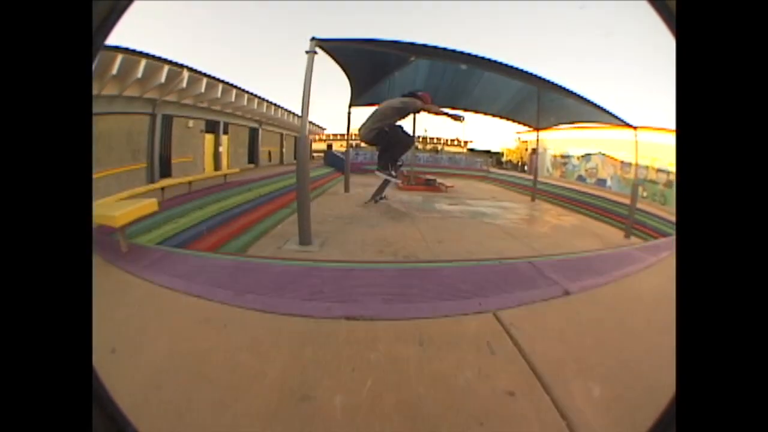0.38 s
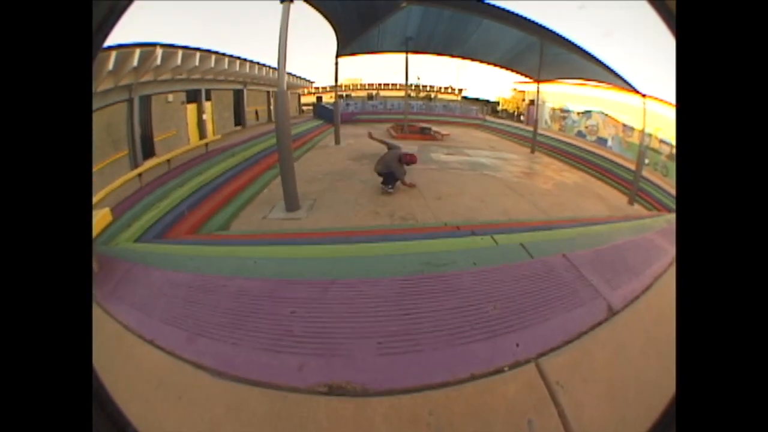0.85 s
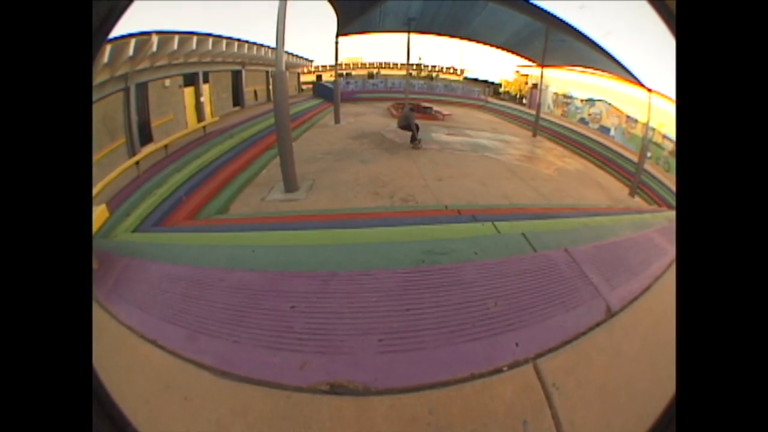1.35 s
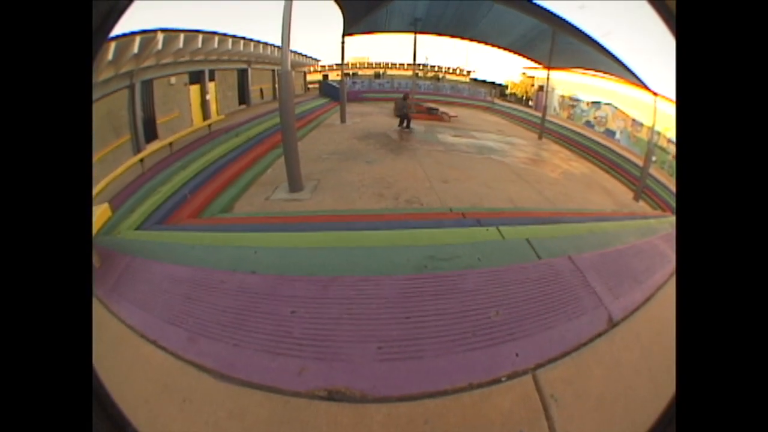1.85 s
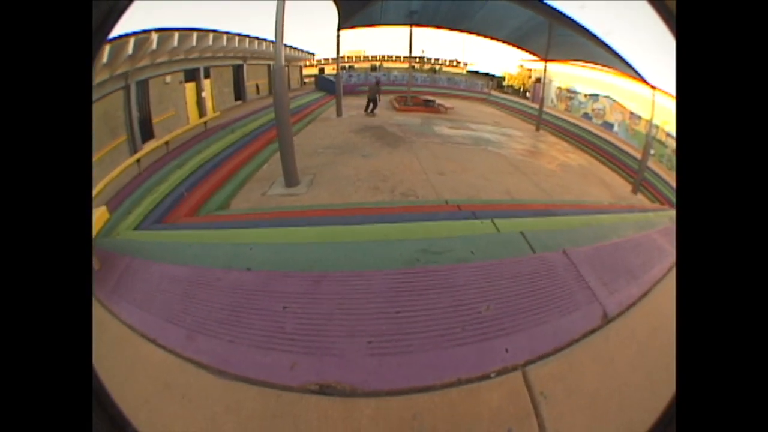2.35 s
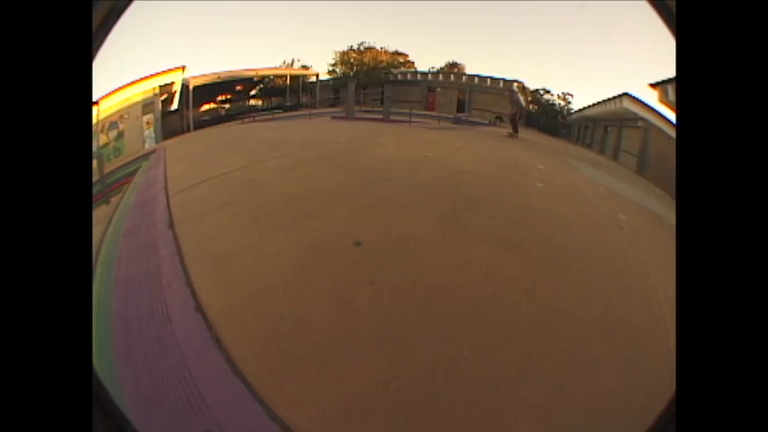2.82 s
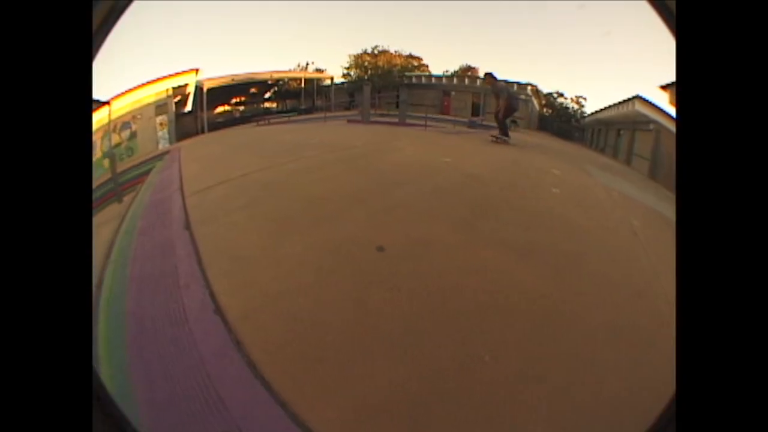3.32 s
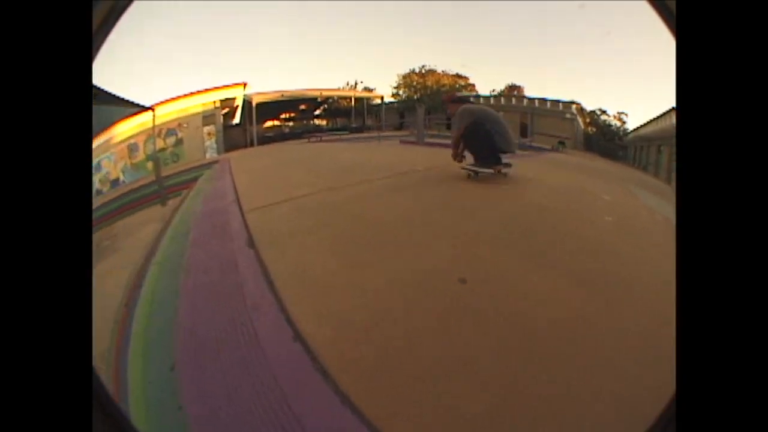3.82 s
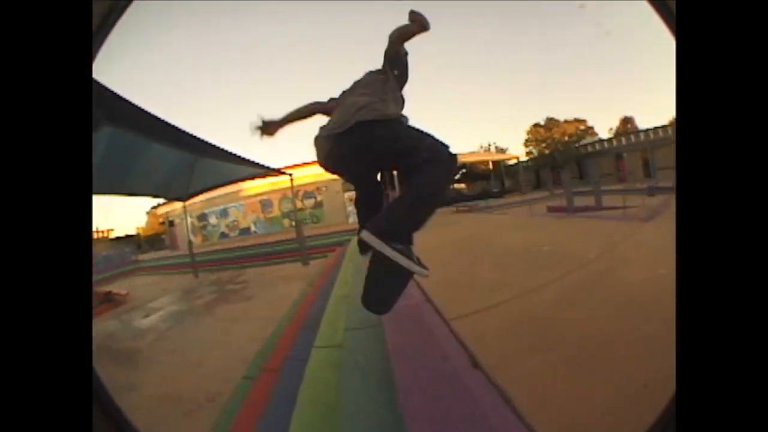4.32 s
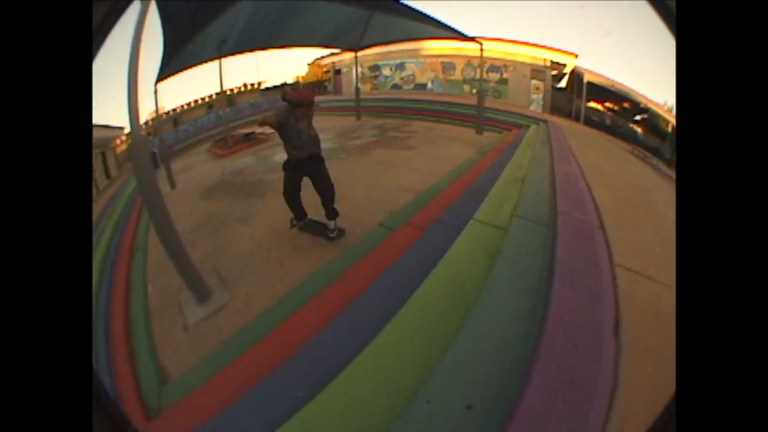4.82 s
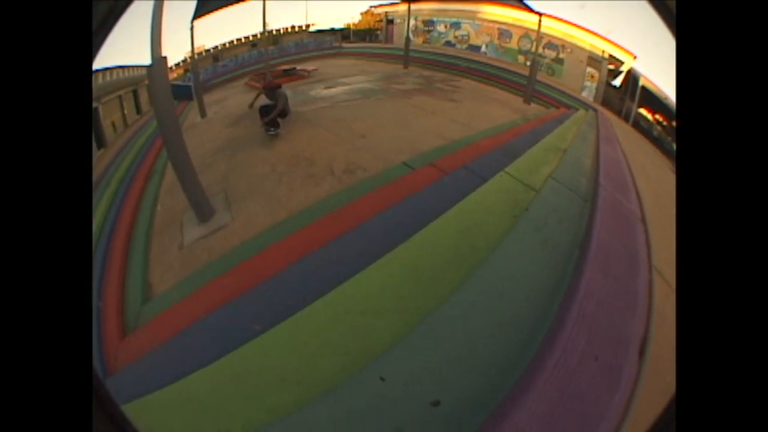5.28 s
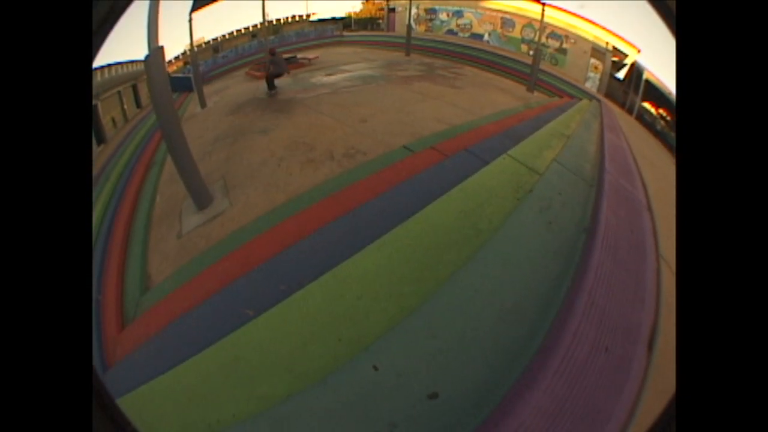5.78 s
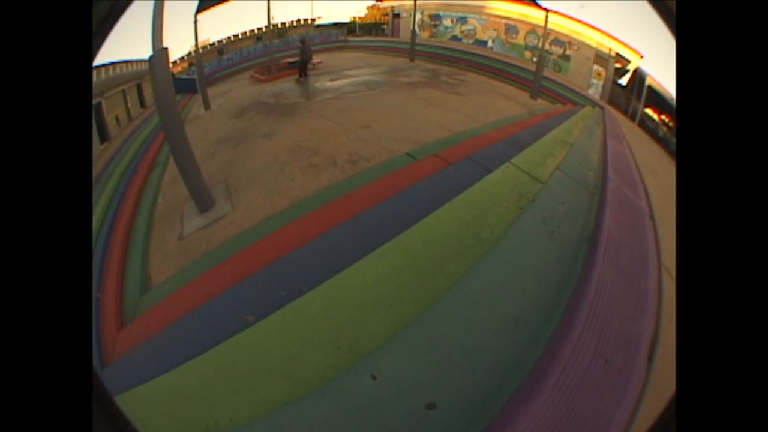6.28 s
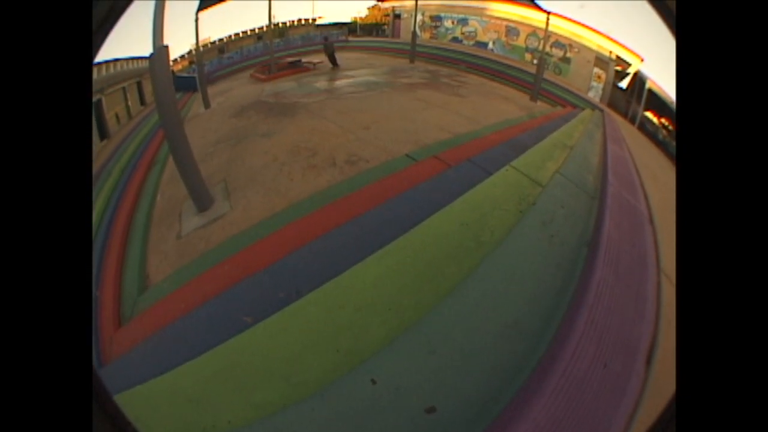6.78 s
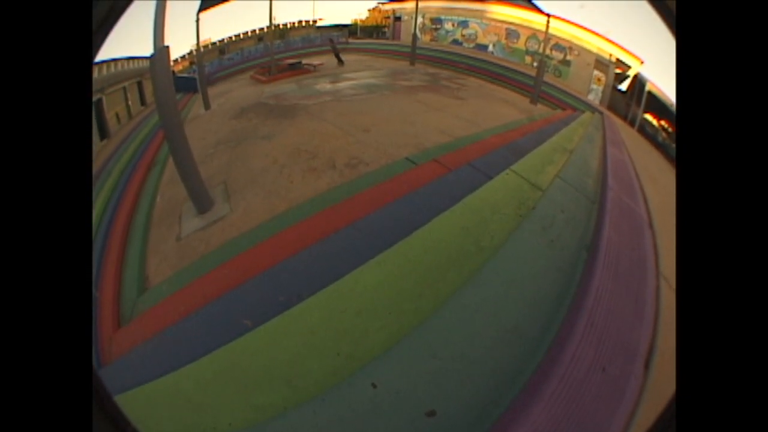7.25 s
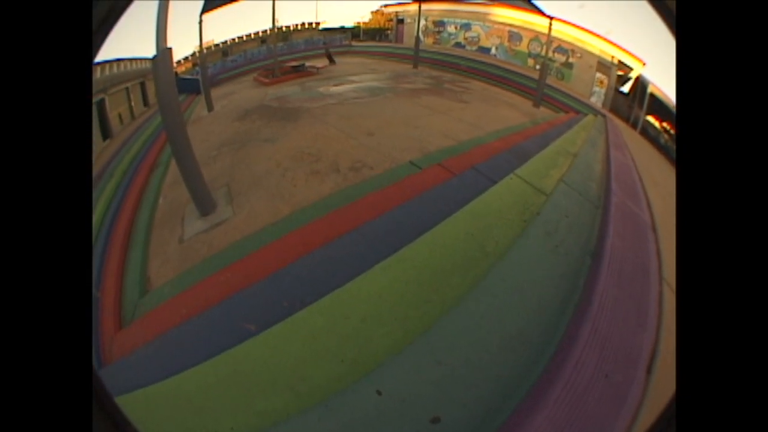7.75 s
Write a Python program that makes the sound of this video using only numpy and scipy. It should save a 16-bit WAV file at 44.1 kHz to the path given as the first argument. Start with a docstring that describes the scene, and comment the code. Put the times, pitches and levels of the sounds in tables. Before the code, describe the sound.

Two skateboard jumps heard by a small stereo microphone beside wide steps. The first starts at the pop, with light ticks, a thin squeak and a sharp landing, then faint rolling. After an abrupt cut, gritty rolling approaches with knocks, a loud snap launches the board, spinning wheels hum, and a heavier distorted landing rings off the walls before the wheels recede.

```python
"""A skateboard in a paved school yard, heard from two places one after the other.
First the tail pops, the board flips, a shoe squeaks, the board lands with a crack below some steps and rolls away.
Then it rolls up over a joint, pops, hums in the air, lands hard and rolls off again.
Noise-driven deck resonances make blows and rolling, short sines the squeak, an unsteady sine the hum.
Decaying noise makes the answering walls; a small stereo microphone overloads on the loudest blows."""
import sys
import numpy as np
from scipy import signal
from scipy.io import wavfile
from scipy.ndimage import uniform_filter1d, map_coordinates

SR = 44100
rng = np.random.default_rng(int(sys.argv[2]) if len(sys.argv) > 2 else 0)


def to_wav(sig):
    """Store sig (one row per channel, or 1-D mono) as 16-bit WAV at the path in sys.argv[1].

    Samples outside -1..1 are clipped; the rate is SR.
    """
    pcm = np.clip(np.atleast_2d(sig), -1, 1) * 32767
    pcm = np.round(pcm).astype(np.int16)
    wavfile.write(sys.argv[1], SR, pcm.T)  # frames by channels


def gain_from_db(level_db):
    """Turn a decibel level (scalar or array-like) into a linear amplitude factor."""
    decades = np.asarray(level_db, float) / 20
    return 10 ** decades


N = 347492

# resonances of deck and axles, before the blows widen them and each sound weights them:
# pitch_hz, width_hz, level_db
DECK_MODES = [(157, 222, 0.5), (334, 122, 1), (477.7, 146, 2.5), (612, 152, -5), (700, 200, 1),
              (1010, 100, 0), (1156, 163, 1.5), (1316, 200, -4), (1525, 275, 1.5), (1832, 410, -3.5),
              (2060, 880, -4), (2400, 350, 0.5), (2790, 530, -3.5), (3413, 317, -3), (4050, 365, -1),
              (5180, 630, 3.5)]
BAND_EDGES_HZ = 28 * 2 ** np.arange(0, 9.3, 0.5)   # half octaves


def rms_one(x):
    """Scale to unit rms."""
    return x / np.sqrt(np.mean(x ** 2) + 1e-20)


def unit_energy(x):
    """Scale a short burst to unit energy."""
    return x / np.sqrt(np.sum(x ** 2))


def evened(x):
    """Hold the level steady while the colour moves."""
    return x / np.sqrt(uniform_filter1d(x ** 2, size=6000) + 1e-20)


def in_time(rows):
    """Columns of a curve table at every sample."""
    start_s, *columns = np.transpose(rows)
    return [np.interp(np.arange(N) / SR, start_s, column) for column in columns]


def at_hz(points, hz):
    """Read a table on a log-frequency axis."""
    points_hz, values = np.transpose(points)
    return np.interp(np.log(hz), np.log(points_hz), values)


def drift(rate_hz):
    """Low-passed noise of spread one: a level or pitch that wanders by chance."""
    step = 40   # samples between the values drawn
    pole = np.exp(-2 * np.pi * rate_hz * step / SR)
    white = rng.standard_normal(N // step + 2002)
    slow = signal.lfilter([1], [1, -2 * pole, pole * pole], white)[2000:]
    return np.interp(np.arange(N) / step, np.arange(len(slow)), rms_one(slow))


def resonate(x, hz, width_hz):
    """A two-pole resonance passed twice: gain one on top, steep flanks."""
    r = np.exp(-np.pi * width_hz / SR)
    section = [(1 - r * r) / 2, 0, (r * r - 1) / 2, 1, -2 * r * np.cos(2 * np.pi * hz / SR), r * r]
    return signal.sosfilt([section, section], x)


def cut(x, hz, kind, order=2):
    """Butterworth filter."""
    return signal.sosfilt(signal.butter(order, hz, kind, fs=SR, output="sos"), x)


def bands(white, from_band=0):
    """Half-octave bands; neighbours come from unrelated noises."""
    for k in range(from_band, len(BAND_EDGES_HZ) - 1):
        low_hz, high_hz = BAND_EDGES_HZ[k:k + 2]
        yield np.sqrt(low_hz * high_hz), cut(white[k % 2], [low_hz, high_hz], "band")


def spread(pair, likeness):
    """Left and right from a shared and an opposed noise."""
    alike = np.clip(likeness, -1, 1)
    return np.sqrt(1 + alike) * pair[0] + np.sqrt(1 - alike) * pair[1] * [[1], [-1]]


def favour_db(hz, centre_hz, db_per_octave):
    """Modes far from the strongest tone are driven less."""
    return -db_per_octave * np.abs(np.log2(hz / centre_hz))


def blows():
    """Blows and their first wall echoes: a short rough force drives the deck modes and a bright snap."""
    # blows on the board and their first wall echoes:
    # start_s, level_db, strongest_tone_hz, crack_db (re body), yard_db (re blow)
    hits = [(0.02, -9, 2080, -1.5, -19), (0.076, -29, 810, 1, -30), (0.131, -26, 988, -20, -14),
            (0.274, -27, 902, -5.5, -1.5), (0.35, -28, 970, -27, -20), (0.528, -28.5, 825, -2, -10),
            (0.692, 5, 1560, -8.5, -18), (0.702, -4.5, 1670, -1.5, -38), (0.712, 0.5, 1420, -16, -14.5),
            (0.729, -11.5, 620, -3.5, -15.5), (0.743, -17, 734, -7.5, -3), (0.765, -19, 820, -26, -4),
            (2.698, -30.5, 1170, -5, -12), (2.727, -39, 1210, -13, -23), (2.826, -30.5, 506, -11, -7),
            (2.846, -30, 470, -40, -24), (3.274, 6, 635, -10, -29), (3.31, -14, 600, -9.5, -26),
            (3.368, -1, 930, -6.5, -33), (3.405, -17.5, 626, -11.5, -31), (3.64, -26, 650, -15, -22),
            (3.727, -27, 660, -11, -24), (4.239, 7.5, 2090, -4.5, -23.5), (4.248, -4, 800, -1, -31),
            (4.289, -18, 1160, -27, -7.5), (4.304, -22, 1070, -22, -21), (4.379, -22.5, 1140, -31, -5),
            (4.435, -34.5, 1130, 2, 1.5), (4.659, -21.5, 900, -4, -9), (4.671, -21, 810, -1, -10),
            (4.9164, 7, 1730, -5.5, -21), (4.925, 13, 1180, -5, -25.5), (4.934, 8.5, 1230, -6, -45),
            (4.944, 6.5, 830, -37, -39), (4.954, -1, 940, -6, -20), (4.961, 1, 1000, -30, -47),
            (5.006, -20, 1010, -33, 2.5), (5.729, -36, 476, -2, -22), (6.415, -31.5, 552, -1.5, -6),
            (6.427, -31, 600, -8, -17), (6.983, -23.5, 1020, -6, -6.5), (7.024, -24, 1450, -6, -20),
            (7.05, -30, 1460, -4, -7), (7.122, -26, 930, -6.5, -5), (7.149, -29, 900, -4, -20)]
    near, to_yard, size = np.zeros(N), np.zeros(N), 3000
    t = np.arange(size) / SR
    chance = rng.standard_normal((len(hits), size + len(DECK_MODES) + 1))
    for (start_s, level_db, tone_hz, crack_db, yard_db), row in zip(hits, chance):
        rough, mode_chance, crack_chance = row[:size], row[size:-1], row[-1]
        # the crack is centred higher from the second place, and strays by about an eighth of an octave
        crack_hz = (3300 if start_s > 2.9 else 2820) * 2 ** (0.12 * crack_chance)
        rise_s = 1.5 / tone_hz   # soft, low blows build up more slowly
        # low blows last longer; far ones, rich in yard sound, arrive smeared
        contact_s = (0.0042 + 1.38 / tone_hz) * gain_from_db(0.072 * (yard_db + 29.5))
        force = rough * (1 - np.exp(-t / rise_s)) * np.exp(-(t / contact_s) ** 1.25)
        body = 0
        crack = gain_from_db(-9.5) * unit_energy(cut(force, [3000, 11000], "band"))
        for (hz, width_hz, mode_db), luck in zip(DECK_MODES, mode_chance):
            widening = 1.9 if hz < 2200 else 3.2
            rung = unit_energy(resonate(force, hz, widening * width_hz)) * gain_from_db(mode_db + 1.5 * luck)
            if hz < 2200:
                body = body + rung * gain_from_db(favour_db(hz, tone_hz, db_per_octave=7))
            else:
                crack = crack + rung * gain_from_db(favour_db(hz, crack_hz, db_per_octave=16.5))
        blow = unit_energy(body) + gain_from_db(crack_db) * unit_energy(crack)
        # longer contacts carry more energy at the same height
        blow *= gain_from_db(level_db) * np.sqrt((contact_s + 0.0024) * SR / 2)
        at = round(start_s * SR)
        near[at:at + size] += blow
        to_yard[at:at + size] += gain_from_db(yard_db) * blow
    return near, to_yard


def pavement(per_s, uneven_db):
    """Grains of the paving under the wheels: dense random jolts of uneven size."""
    sizes = gain_from_db(uneven_db * np.minimum(rng.exponential(1, N), 5)) * rng.choice([-1, 1], N)
    return rms_one(sizes * (rng.random(N) < per_s / SR))


def shaking():
    """Heights of axle rattle and slab thud that die away after each hard contact."""
    # hard contacts: start_s, rattle_db, thud_db
    contacts = np.array([(0.0, -57, -39.5), (0.699, -49, -41.5), (4.93, -34, -38), (6.97, -49.5, -46)])
    since_s = np.arange(N) / SR - contacts[:, :1]
    heights = []
    for column, fade_db_per_s in [(1, 37), (2, 48)]:
        fading = gain_from_db(contacts[:, [column]] - fade_db_per_s * np.abs(since_s))
        heights.append(np.sum((since_s >= 0) * fading, axis=0))
    return heights


def rolling():
    """Jolts shake the deck modes and the slab; the finest grit hisses straight from the wheels."""
    # wheels, one list per listening place: start_s, rumble_db, strongest_tone_hz, hiss_db
    wheel_curves = [
        [(0.0, -33, 766, -40.5), (0.5, -43, 830, -41.5), (0.74, -52, 850, -42), (0.94, -40.5, 730, -56),
         (1.08, -51.5, 700, -59), (1.25, -49, 546, -52.5), (1.62, -44, 600, -48.5), (1.8, -51.5, 605, -53),
         (2.32, -48, 420, -58.5), (2.68, -50.5, 640, -56), (2.89, -55, 470, -58.5)],
        [(2.9, -29.5, 674, -42.5), (3.16, -24, 517, -40), (3.38, -28.5, 714, -39.5), (3.47, -27, 660, -39.5),
         (3.8, -28.5, 500, -38.5), (4.05, -26.5, 560, -36.5), (4.19, -27.5, 790, -31.5),
         (4.31, -41, 760, -33.5), (4.38, -53, 1050, -41.5), (4.6, -47.5, 801, -44.5), (4.77, -40, 527, -37.5),
         (4.83, -68, 795, -57), (4.98, -28.5, 878, -41), (5.1, -29.5, 620, -39), (5.45, -35, 520, -41.5),
         (5.62, -40, 614, -46.5), (6.35, -45.5, 504, -52), (6.95, -46, 547, -51.5), (6.99, -35.5, 880, -41.5),
         (7.2, -42, 540, -52), (7.88, -45, 546, -54)],
    ]
    # colour of the grit: pitch_hz, density_db (per Hz)
    grit_colour = [(1470, -41), (2500, -8), (2970, 0.5), (3370, 9), (5330, 3.5), (6480, 3), (9710, -0.5),
                   (14000, -24), (14700, -42), (15000, -79)]
    rumble_db, tone_hz, hiss_db = in_time(wheel_curves[0] + wheel_curves[1])
    loose, slab = shaking()
    jolts = pavement(3000, uneven_db=1.0)
    rumble, rattle = np.zeros(N), np.zeros(N)
    for k, (hz, width_hz, mode_db) in enumerate(DECK_MODES):
        wander_db = 1.5 * drift(2) + drift(20)
        # neighbouring modes ring in opposite polarity
        shaken = (-1) ** k * resonate(jolts, hz, width_hz) * gain_from_db(mode_db + wander_db)
        if hz < 1100:
            rumble += shaken * gain_from_db(favour_db(hz, tone_hz, db_per_octave=7.5))
        elif hz < 2200:
            rattle += shaken * gain_from_db(favour_db(hz, 2.2 * tone_hz, db_per_octave=4.5))
    grit = np.array([pavement(9000, uneven_db=2.2), pavement(9000, uneven_db=2.2)])
    hiss = sum(band * gain_from_db(at_hz(grit_colour, hz) + 0.8 * drift(5))
               for hz, band in bands(grit, from_band=12))
    thud = rms_one(cut(jolts, [95, 230], "band"))
    judder = gain_from_db(0.9 * drift(14))
    # the axles rattle with the grit, the slab thuds with the rumble
    rattle_gain = gain_from_db(hiss_db - 0.16) + loose
    thud_gain = gain_from_db(rumble_db - 23 + 2.5 * drift(6.6)) + slab
    deck = gain_from_db(rumble_db) * evened(rumble) + rattle_gain * evened(rattle)
    ground = gain_from_db(hiss_db) * rms_one(hiss) + thud_gain * thud
    return judder * (deck + ground)


def spin_hum():
    """The airborne board hums while its wheels spin free: a narrow, unsteady tone that stutters in level."""
    # hum curve: start_s, pitch_hz, level_db
    hum_curve = [(4.28, 1110, -32), (4.41, 1129, -34), (4.528, 1136, -38.5), (4.63, 1100, -43)]
    hz, level_db = in_time(hum_curve)
    t = np.arange(N) / SR
    airborne = (t > hum_curve[0][0]) & (t < hum_curve[-1][0])
    gate = uniform_filter1d(1.0 * airborne, size=400)
    unsteady_hz = hz + 90 * drift(150)
    tone = np.sin(2 * np.pi * np.cumsum(unsteady_hz) / SR)
    return gate * gain_from_db(level_db + 3.5 * drift(40)) * tone


def squeak():
    """A shoe slips on the grip: each slip is a short rough tone that sags in pitch as it lets go."""
    # slips: start_s, level_db (before roughening), pitch_hz (nominal), rise_s (time to peak)
    slips = [(0.427, -36, 2400, 0.0043), (0.471, -39, 2440, 0.0066), (0.49, -27, 2380, 0.0058),
             (0.51, -40, 2450, .007), (0.534, -27, 2310, .004), (0.542, -27, 2444, .013)]
    out, t = np.zeros(N), np.arange(3000) / SR
    for start_s, level_db, hz, rise_s in slips:
        swell = t / rise_s * np.exp(1 - t / rise_s)
        tone = np.sin(2 * np.pi * hz * t * (1.02 - 0.013 * t / rise_s))
        out[round(start_s * SR):][:len(t)] += gain_from_db(level_db) * swell ** 2 * tone
    return out * gain_from_db(3.0 * drift(150))


def two_ports(x):
    """The nearer microphone port hears the board earlier; long waves bend round the housing and lag more."""
    # direction of the board: start_s, lag_us (left behind right, long waves), pan_db (left minus right)
    direction_curve = [(0, 58, 2), (2.894, -7, 2.5), (2.899, 104, -5), (3.7, 102, -0.5), (4.2, 49, -2.5),
                       (4.7, -41, 0.5), (5.3, -110, 0), (6.2, -112, 2.5), (6.8, -71, 2.5), (7.88, -39, 3.5)]
    lag_us, pan_db = in_time(direction_curve)
    half = lag_us * SR / 2e6   # samples, shared between the two sides
    low = cut(x, 2300, "low", order=1)
    heard = []
    for side in (1, -1):
        long_waves = map_coordinates(low, [np.arange(N) - side * half], order=1, mode="nearest")
        short_waves = map_coordinates(x - low, [np.arange(N) - 0.5 * side * half], order=3, mode="nearest")
        heard.append(long_waves + short_waves)
    return np.array(heard) * gain_from_db(np.array([pan_db, -pan_db]) / 2)


def scatter(x, turns_per_s):
    """Steps and ground close by throw the treble back within milliseconds, in a turning pattern per side."""
    t, turn = np.arange(2500) / SR, 2 * np.pi * turns_per_s * np.arange(N) / SR
    burst = rng.standard_normal((2, 2, len(t))) * np.sqrt(t) * np.exp(-t / 0.007)
    answer = cut(burst, 2400, "high", order=3)
    answer = answer / np.sqrt(np.sum(answer ** 2) / 4)
    mixed = x * np.array([np.cos(turn), np.sin(turn)])[:, None]   # fades between two patterns
    return signal.oaconvolve(mixed, answer, axes=2).sum(axis=0)[:, :N]


def yard(x):
    """Noise that dies band by band and swells as each wall answers."""
    # reverberation time: pitch_hz, t60_s
    decay_times = [(100, 0.98), (500, 0.71), (2000, 0.93), (5000, 1), (12000, 0.37)]
    # left-right likeness: pitch_hz, likeness (1 = same on both sides)
    side_likeness = [(100, 1), (600, 0.92), (1500, 0.15), (3000, 0.047), (7000, 0.017)]
    # swells in the yard's answer: delay_s, level_db
    wall_swells = [(0.041, 9), (.062, -12), (.095, 4), (.14, -4), (.21, -5), (.3, -12)]
    t = np.arange(SR) / SR
    swells = 0.92 * (1 - np.exp(-(t / 0.046) ** 3))
    for delay_s, level_db in wall_swells:
        width_s = 0.0071 + 0.023 * delay_s   # later swells are broader
        swells = swells + gain_from_db(level_db) * np.exp(-((t - delay_s) / width_s) ** 2)
    answer = sum(spread(pair, at_hz(side_likeness, hz)) * gain_from_db(-60 * t / at_hz(decay_times, hz))
                 for hz, pair in bands(rng.standard_normal((2, 2, len(t)))))
    answer = answer * swells
    answer = answer / np.sqrt(np.sum(answer ** 2) / 2)
    return signal.fftconvolve(x[None], answer, axes=1)[:, :N]


def air():
    """Far traffic and microphone hiss: steady noise, slowly breathing by band."""
    # colour of the background: pitch_hz, density_db
    air_colour = [(15, -51), (25, -2), (250, 2), (344, -3), (415, -13), (515, 4), (1720, -7.5), (2850, -67),
                  (3440, -63.5), (9020, -14.5), (13100, -65), (15000, -62)]
    # left-right likeness: pitch_hz, likeness (1 = same on both sides)
    side_likeness = [(60, 0.72), (240, 0.87), (940, 0.21), (3690, 0.14), (14600, 0.29)]
    out = sum(spread(pair, at_hz(side_likeness, hz)) * gain_from_db(at_hz(air_colour, hz) + drift(0.83))
              for hz, pair in bands(rng.standard_normal((2, 2, N))))
    return gain_from_db(-48) * rms_one(out)


def scene():
    """Board, shoe, yard and background."""
    roll = rolling()
    near, to_yard = blows()
    board = roll + near + squeak() + spin_hum()
    close = two_ports(board) + gain_from_db(-6.5) * scatter(board, turns_per_s=1.3)
    return close + yard(to_yard + gain_from_db(-9.5) * roll) + air()


def limiter(x, threshold_db, ratio_share, release_db_per_s, attack_s):
    """The gain ducks a moment after a loud blow and climbs back."""
    level_db = 10 * np.log10(uniform_filter1d(np.mean(x ** 2, axis=0), size=100) + 1e-12)
    ramp = release_db_per_s * np.arange(N) / SR
    held_db = np.maximum.accumulate(level_db + ramp) - ramp   # peaks fall back at the release rate
    over_db = np.maximum(held_db - threshold_db, 0)
    r = np.exp(-1 / (attack_s * SR))
    return x * gain_from_db(-ratio_share * signal.lfilter([1 - r], [1, -r], over_db))


def roll_off(x):
    """The treble ends steeply here."""
    return signal.sosfilt(signal.butter(12, 15180, fs=SR, output="sos"), x)


def record(dry):
    """The limiter is too slow for the blows, which overload the input; the input passes no deep bass."""
    dulled = cut(dry, 14800, "low", order=6)
    loud = limiter(dulled, threshold_db=-18, ratio_share=0.4, release_db_per_s=700, attack_s=0.008)
    clipped = loud / (1 + loud ** 8) ** (1 / 8)   # bends over just below full scale
    mix = cut(clipped, 43, "high")
    return roll_off(mix)


dry = scene()
out = record(dry)
to_wav(out)
```